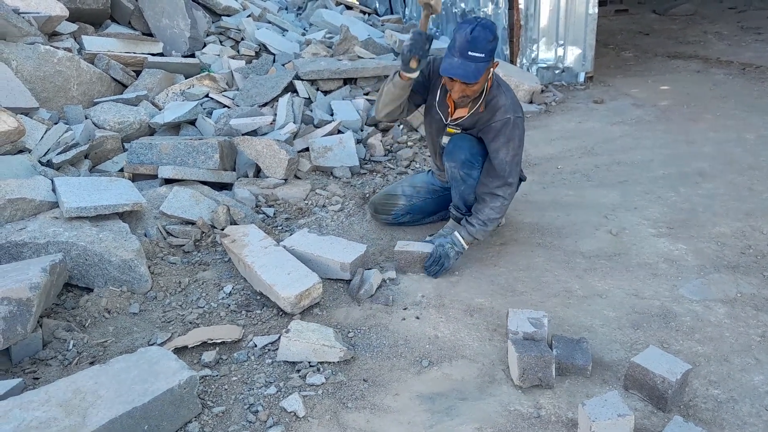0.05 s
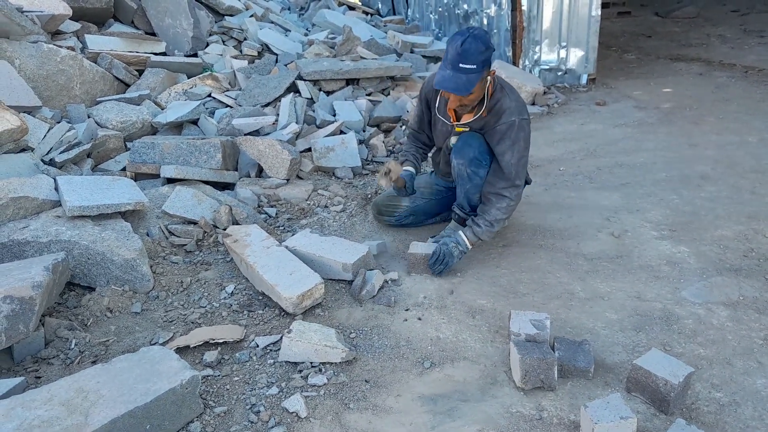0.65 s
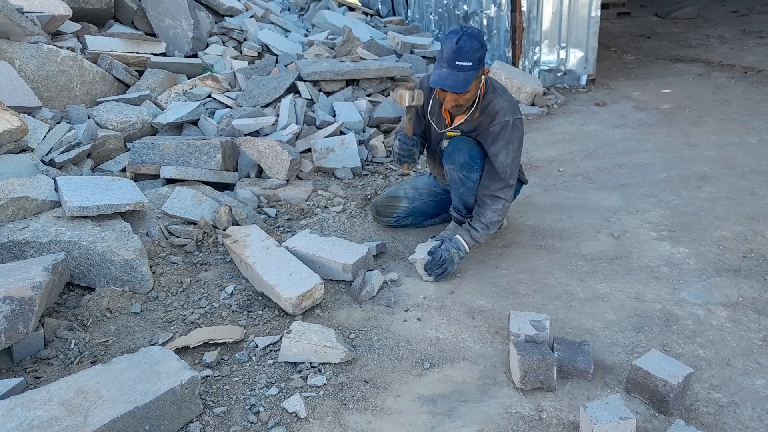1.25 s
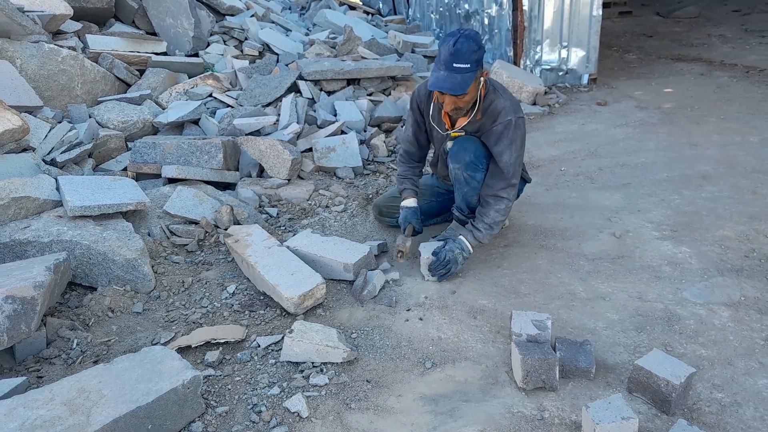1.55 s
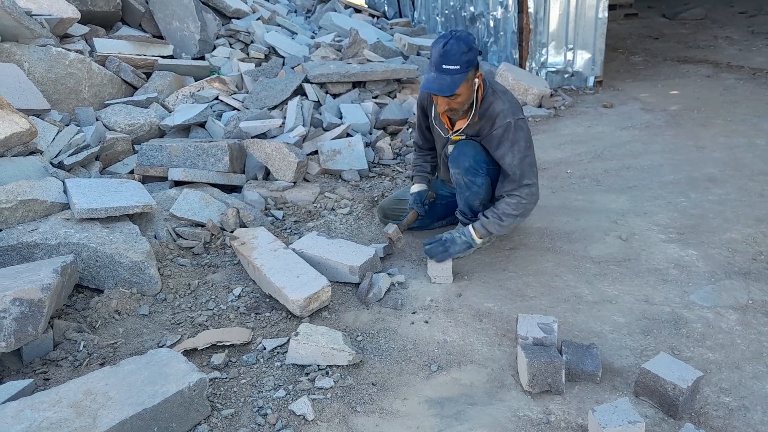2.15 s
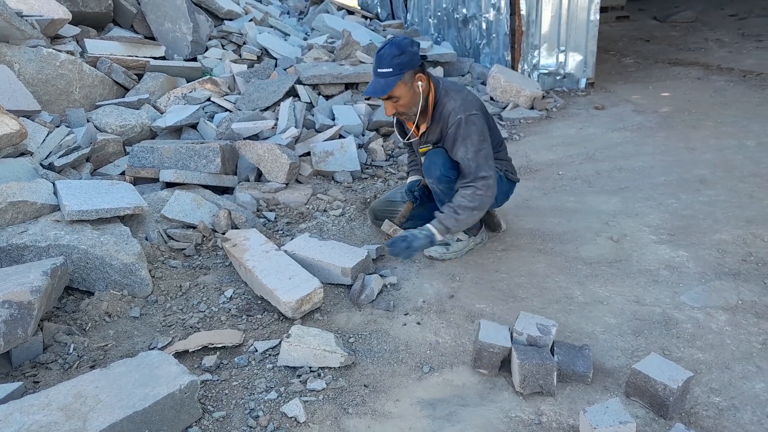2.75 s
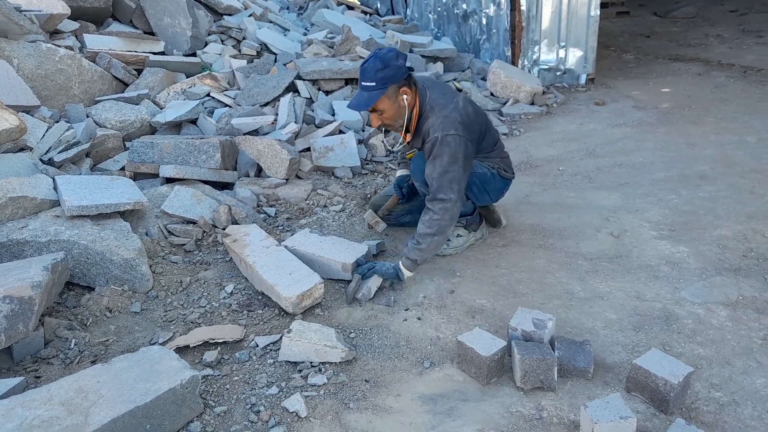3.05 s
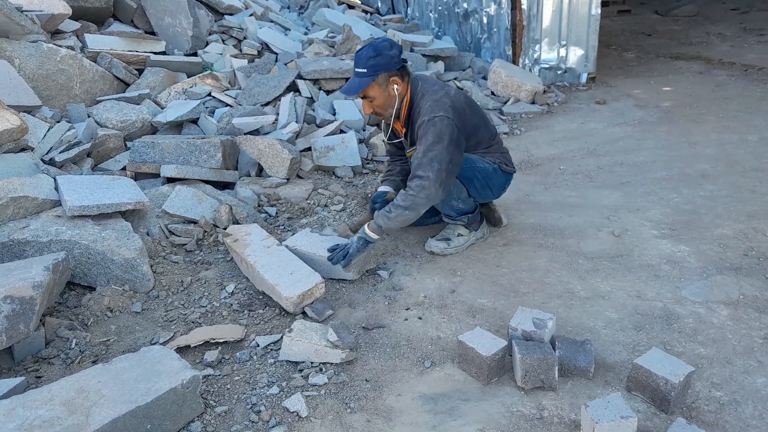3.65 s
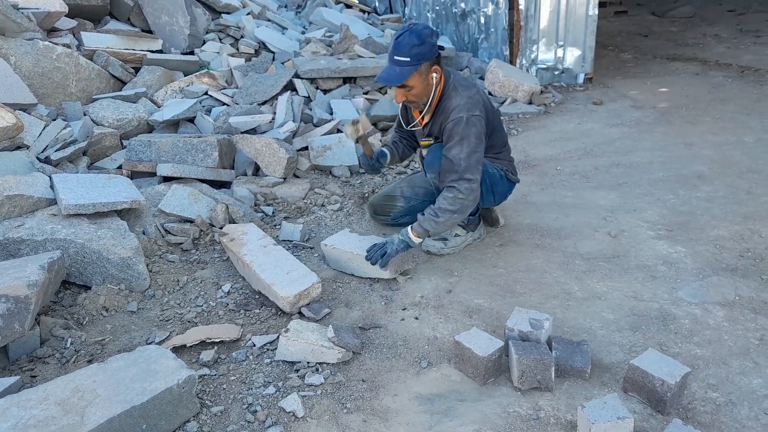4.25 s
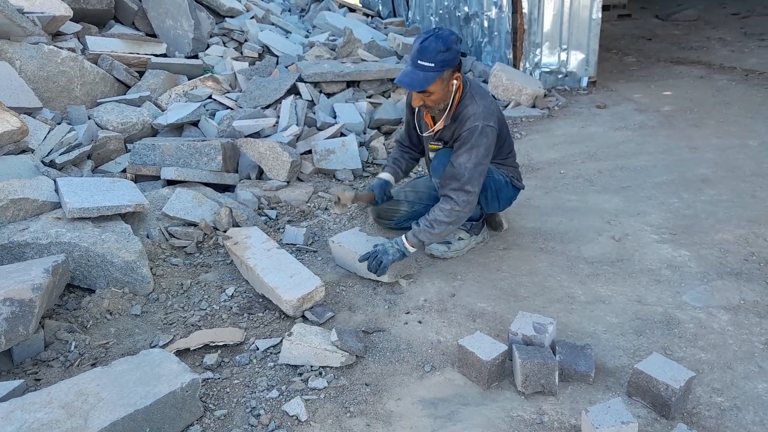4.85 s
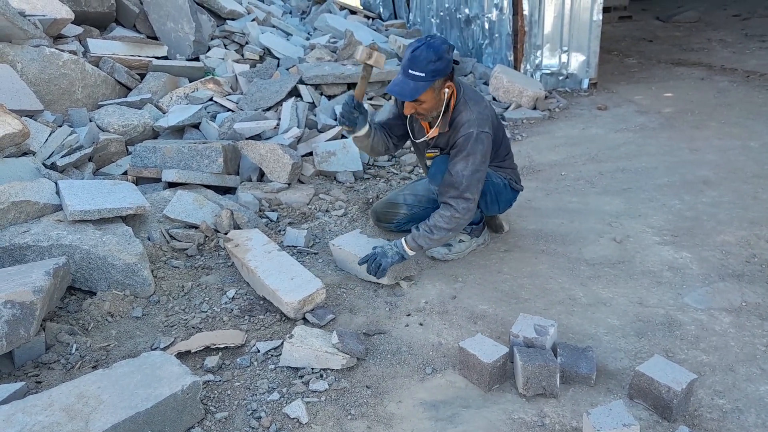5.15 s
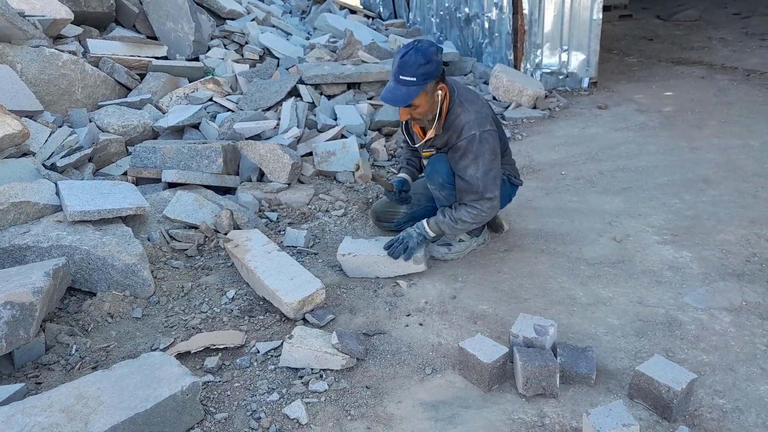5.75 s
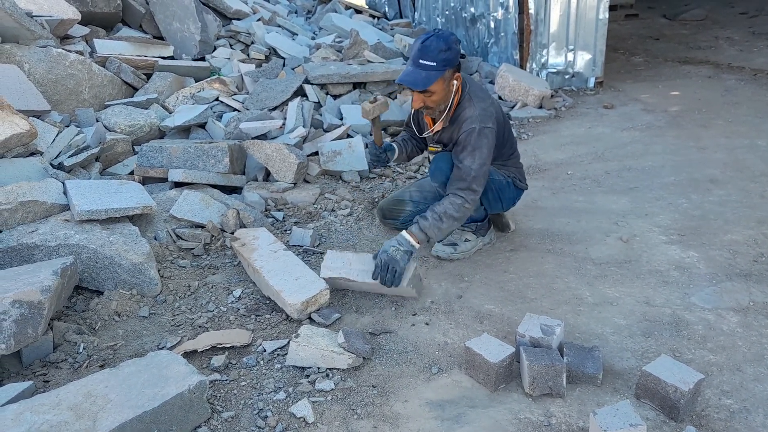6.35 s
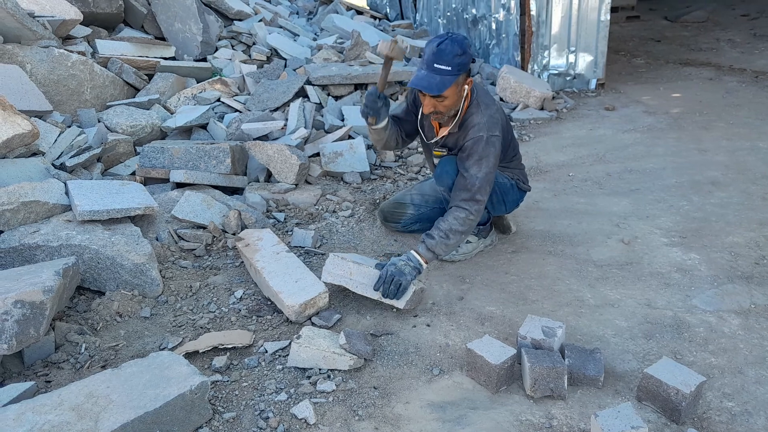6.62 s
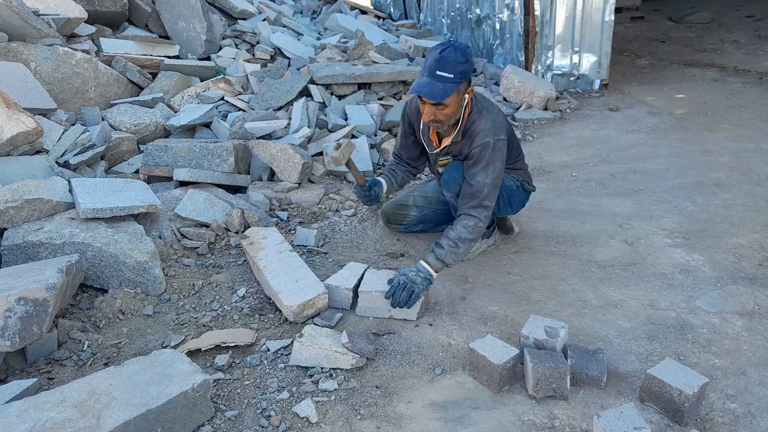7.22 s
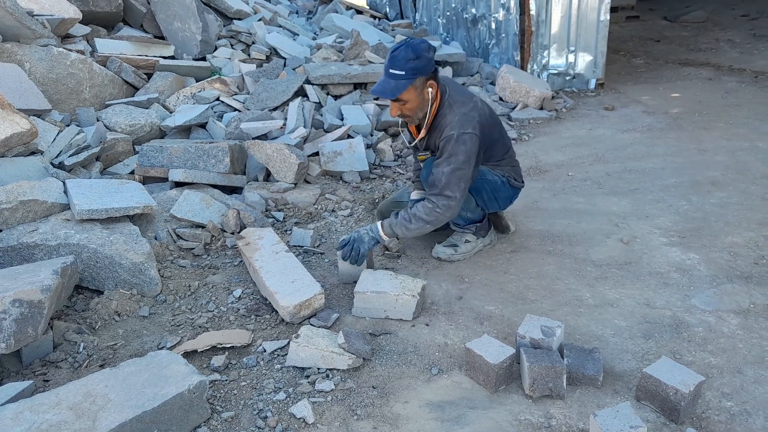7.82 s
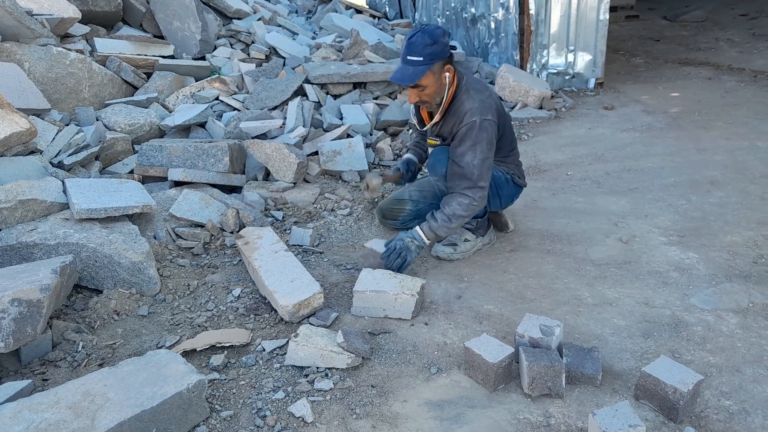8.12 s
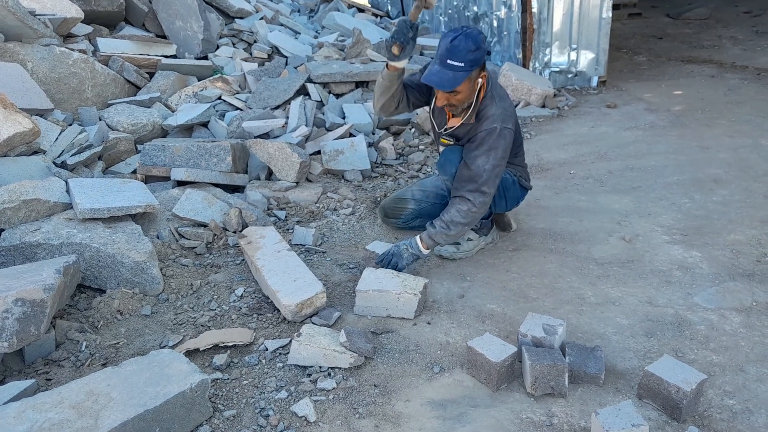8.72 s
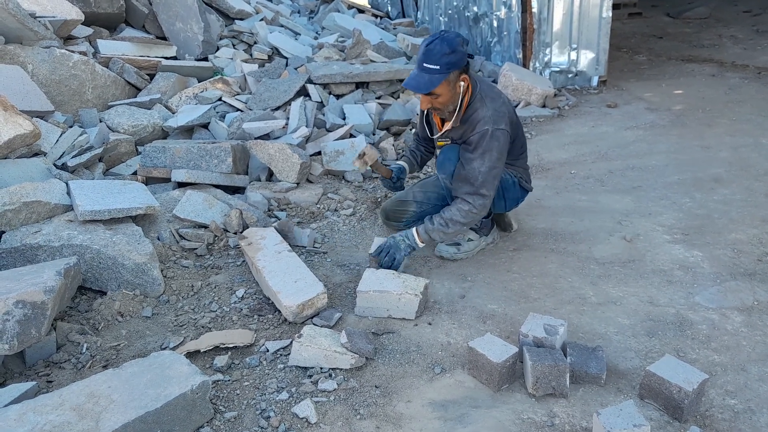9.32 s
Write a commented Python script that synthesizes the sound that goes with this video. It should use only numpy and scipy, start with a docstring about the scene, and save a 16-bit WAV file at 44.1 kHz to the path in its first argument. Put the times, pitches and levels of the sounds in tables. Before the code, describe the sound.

Sharp hammer blows crack stone outdoors, with short echoes, ticking chips and blocks clinking and scraping on concrete.

```python
"""A mason splits stone in an open yard. First his sleeve swishes and wind nudges the microphone.
Three hammer blows crack the slab: stone and steel ring, chips fly, rubble and sheds throw the sound back.
Then blocks thud down, clink together and scrape over gritty concrete. Two blows follow around 5 s,
and two more near 7 s and 9 s, among further scrapes, knocks and gusts.
A last clink ends the scene, over the low rumble that lies under it all."""
import sys
import numpy as np
from scipy import signal
from scipy.fft import rfft, irfft, next_fast_len
from scipy.io import wavfile

SR = 44100
rng = np.random.default_rng(int(sys.argv[2]) if len(sys.argv) > 2 else 0)


def transcribe(signal):
    """Save signal, clipped to [-1, 1], as a 16-bit WAV file at the path in sys.argv[1]."""
    frames = np.atleast_2d(signal).T
    limited = np.clip(frames, -1, 1)
    pcm = np.round(limited * 32767).astype(np.int16)
    wavfile.write(sys.argv[1], SR, pcm)


N = 422478

# Levels are relative. t60 is the time a sound takes to fade by 60 dB.
# hammer blows: t/s, level/dB, treble/dB, fizz/dB, body f/Hz, body level/dB,
# ring f/Hz, ring level/dB, ring damping/factor, steel level/dB, echo level/dB
HAMMER_BLOWS = [(0.3823, -0.5, -1, -6, 800, 2, 2960, -18.5, 3.5, -28.5, 0.5),
                (1.5180, 1, 5.5, -5.5, 1050, 8, 5800, -30, 4, -35, -5),
                (2.0282, -4, -6.5, 16.5, 1090, 5.5, 3740, -26, 3.8, -33.5, -5.5),
                (4.8367, -1, -3, -4.5, 760, 6.5, 3450, -31.5, 0.7, -37.5, 2),
                (5.4048, 0, -7.5, -1, 720, 5.5, 2930, -19.5, 1.86, -39, 2),
                (7.054, -1, 7.5, -12.5, 710, 6, 4290, -33.5, 2.9, -34.5, 3.5),
                (8.9939, 2, 0.5, -9, 1410, -1, 1980, -33, 2.9, -36, -0.5)]
# the tones of a piece of stone: multiple of its ring pitch, level/dB, t60/s
STONE_TONES = [(1, 8, 0.042), (1.035, -11, 0.026), (1.13, -1, 0.043), (1.376, -8.5, 0.081),
               (1.805, -16.5, 0.085), (2.185, -18.5, 0.031)]
# the tones of the steel hammer head: f/Hz, level/dB, t60/s
STEEL_TONES = [(9720, 0, 0.1), (9780, -12.5, 0.11), (12550, -12.5, 0.036), (6470, -16.5, .1)]
# the tones of the ground under the slab: f/Hz, level/dB, t60/s
GROUND_TONES = [(222, -3, 0.061), (410.3, -3, 0.045)]
# the crack of crushed stone: f/Hz, level/dB
CRACK_SPECTRUM = [(30, 1), (90, 5.5), (200, 23.5), (320, 18), (700, 20), (1200, 16.5), (1800, 12.5),
                  (3000, 13), (4800, 7), (7000, 2), (9000, -3.5), (13000, -3), (16000, -9.5)]
# blocks meeting the ground: t/s, level/dB, treble/dB, body f/Hz, body level/dB
BLOCK_DROPS = [(1.028, -22.5, 5, 290, 8.5), (2.0442, -16, 14.5, 705, 2.5), (2.7552, -37.5, 28, 900, 12),
               (2.7766, -26.5, -25, 770, 10.5), (2.8109, -15.5, -3, 1010, 12.5), (3.955, -37, -8, 1210, 9),
               (4.3065, -31.5, 16, 950, 1.5), (6.411, -25, 6, 960, 3), (6.461, -32.5, 0, 140, 5.5),
               (7.651, -40, 5, 892, 5), (8.2232, -25, 11, 371, 6), (8.595, -41.5, 5.5, 508, 5)]
# stone knocking on stone: t/s, level/dB, treble/dB, ring f/Hz, ring level/dB, ring damping/factor
STONE_KNOCKS = [(3.103, -19.5, -7, 2740, -42, 1.7), (3.193, -16.5, 2, 3300, -27.5, 3.2),
                (3.204, -19.5, -2, 1900, -35.5, 0.8), (3.282, -7, -30, 3570, -27.5, 1),
                (3.337, -27.5, 9, 4600, -49.5, 0.7), (3.422, -44, 30, 3610, -44, 1),
                (3.5849, -9, -40, 2000, -41, 2), (3.683, -27, -12, 3130, -40, 1.2),
                (4.215, -26.5, 15, 2990, -41, 1.35), (6.409, -40, 21.5, 3100, -40, 0.94),
                (7.7463, -19.5, 5.5, 3340, -42.5, 1.3), (9.364, -33, 1, 1134, -44, .6),
                (9.478, -22.5, -21, 1174, -42.5, 0.69)]
# the loudest chips snapping or landing: t/s, level/dB, body f/Hz
LOUD_CHIPS = [(0.77, -31.5, 6780), (2.058, -20, 11000), (2.118, -24.5, 7500), (3.186, -18.5, 2940),
              (3.257, -26, 8050), (4.227, -24.5, 3840), (6.265, -35, 4000), (6.304, -33.5, 3200),
              (6.443, -32, 4800), (6.558, -37.5, 3140)]
# a block or boot dragged over grit: t/s, length/s, level/dB
DRAGS = [(0.65, 0.19, -66), (1.15, .25, -72.5), (2.24, 0.15, -69), (2.5, 0.016, -57.5), (2.63, .04, -63),
         (2.78, 0.54, -60.5), (3.02, 0.23, -47), (3.35, 1, -56), (3.6, 0.18, -51), (4.12, .18, -58.5),
         (5.6, .28, -63.5), (5.92, 0.049, -59.5), (6.22, 0.34, -61.5), (6.4, 0.054, -55),
         (7.55, 0.33, -67.5), (8.13, 0.21, -63), (8.52, 0.11, -67), (9.25, 0.3, -65)]
# the hiss of grit: f/Hz, level/dB
GRIT_SPECTRUM = [(710, -20), (1200, -63), (1370, -65), (1490, -21.5), (2380, -3.5), (2890, -1.5),
                 (7740, -6.5), (9310, -13), (14800, -9.5), (16000, -33)]
# the sleeve brushing the jacket on the first swing: t/s, length/s, level/dB
SLEEVE_BRUSH = [(0.0, .17, -60)]
# the swish of cloth: f/Hz, level/dB
CLOTH_SPECTRUM = [(880, -29), (1500, -4), (2490, -9), (3550, -5), (7320, -10.5), (9280, -22.5),
                  (16000, -26)]
# the yard's echo: f/Hz, level/dB, time before it fades/s, t60/s
YARD_ECHO = [(80, 9, 0.041, 0.89), (221, -0.5, 0.028, 0.54), (355, 1.5, 0.063, 0.59),
             (800, -0.5, 0.082, 0.64), (1570, 3, 0.038, 0.61), (2830, -2, 0.044, 0.53),
             (6000, -4, 0.041, 0.43), (11990, -5, 0.047, 0.33)]
# single echoes from walls: delay/s, level/dB
WALL_ECHOES = [(.0215, -13), (.057, -13), (.085, -13), (.111, -16)]
# how alike the echo is on the left and right: f/Hz, likeness/0-1
ECHO_LIKENESS = [(50, .7), (250, 0.95), (600, .65), (1200, 0), (3000, 0)]
# gusts on the microphone: t/s, length/s, level/dB
WIND_GUSTS = [(0.03, 0.11, -25), (0.22, .07, -32), (0.58, 0.31, -45), (7.22, 0.367, -36),
              (7.84, 0.536, -30.5), (9.36, 0.068, -39)]
# the rumble of wind: f/Hz, level/dB
WIND_SPECTRUM = [(15, -65.5), (25, -12.5), (86, 6), (141, 0), (316, -12), (545, -25), (600, -28.5),
                 (662, -35.5), (700, -32), (910, -67.5), (1540, -120)]
# the distant background: f/Hz, level/dB
BACKGROUND_SPECTRUM = [(12, -36.5), (20, -29), (33, -7), (60, 2), (154, -12), (270, -14), (347, -16),
                       (410, -20), (698, -17), (1330, -28), (2080, -32.5), (3070, -40.5), (5230, -45.5),
                       (9400, -55.5), (16000, -56.5)]
# its slow swell, used only as a rise and fall around the average: t/s, level/dB
BACKGROUND_SWELL = [(0, -52), (1.3, -56.5), (3.6, -51), (4.5, -52.5), (5.999, -57.5), (7, -56), (9.6, -56)]
# how the two microphones differ: f/Hz, left minus right level/dB
MIC_BALANCE = [(60, 1.5), (110, -4.5), (200, 1), (380, 1.5), (700, 1), (1290, 1.0), (2380, 0.5),
               (4400, -2.5), (8120, 2), (15000, 1)]


def hammer(steel_echo_db=-13, ring_echo_db=-11, thud_echo_db=-3, bite_db=4, thud_db=-21, absorbed=0.9):
    """Each blow cracks the stone, rings stone and steel, thuds into the ground and echoes round the yard."""
    out = np.zeros((2, N))
    for (s, db, treble_db, fizz_db, body_hz, body_db,
         ring_hz, ring_db, damping, steel_db, echo_db) in HAMMER_BLOWS:
        tone = 0, treble_db, fizz_db, [(body_hz, body_db), (ring_hz, bite_db)]
        detune = rng.uniform(0.9975, 1.0025)
        stone = amp(ring_db) * ring(STONE_TONES, ring_hz, damping)
        steel = amp(steel_db) * ring(STEEL_TONES, detune)
        # a bright blow spends its force on breaking the stone, so less reaches the ground
        thud = amp(db + thud_db - absorbed * max(treble_db, 0)) * ring(GROUND_TONES)
        direct = stone + steel + thud
        add(direct, 0, amp(db) * crack(*tone, crush_s=0.003, crumble=2.1))
        # sound leaves in all directions, so the echo carries a smooth, averaged crack
        spread = amp(ring_echo_db) * stone + amp(steel_echo_db) * steel + amp(thud_echo_db) * thud
        add(spread, 0, amp(db) * crack(*tone))
        add(out, s, direct)
        add(out, s, amp(echo_db) * yard(spread))
    return out


def crack(bass_db, treble_db, fizz_db, bodies, crush_s=0, crumble=0, size=2048):
    """A sharp push and crumbling grains, coloured by the stone's broad peaks (bodies: f/Hz, level/dB)."""
    t = np.arange(size) / SR
    hz = abs(np.fft.fftfreq(size, 1 / SR)) + 1
    grains = colour(rng.standard_normal((2, size)), [(300, -2.5), (1200, -5), (3000, -5.5)],
                    [(900, 0.93), (3000, 0.21), (7000, -0.48), (13000, 0.26)])
    grains *= np.exp(-t / (crush_s + 1 / SR))
    push = t == 0
    force = push + crumble * grains / np.linalg.norm(grains, axis=1, keepdims=True)
    shape_db = read(CRACK_SPECTRUM, hz) + bass_db / (1 + (hz / 1300) ** 3)
    shape_db += treble_db / (1 + (4500 / hz) ** 3)
    shape_db += fizz_db / (1 + (9000 / hz) ** 6)
    shape_db += sum(db / (1 + (np.log(hz / f) / 0.36) ** 2) for f, db in bodies)
    # a filter of that shape which makes no sound before the push
    response = np.exp(np.conj(signal.hilbert(np.log(amp(shape_db)))))[:size // 2 + 1]
    return irfft(rfft(force) * response) / np.hypot(1, crumble)


def ring(tones, pitch=1, damping=1):
    """A struck thing rings with a few fading tones; damping, as from a pressing hand, shortens them."""
    t = np.arange(SR // 6) / SR
    phases = rng.uniform(-0.7, 0.7, (len(tones), 2, 1))
    return sum(amp(db - 60 * damping * t / t60) * np.sin(2 * np.pi * f * pitch * t + phase)
               for (f, db, t60), phase in zip(tones, phases))


def thuds(bass_db=14, weight_hz=135, weight_db=5, ring_hz=1130, ring_db=-21, echo_db=-9):
    """A block meets the ground: a heavy, dull knock that crushes grit and barely rings."""
    out, spread = np.zeros((2, 2, N))
    for s, db, treble_db, body_hz, body_db in BLOCK_DROPS:
        tone = bass_db, treble_db, 0, [(body_hz, body_db), (weight_hz, weight_db)]
        add(out, s, amp(db + ring_db) * ring(STONE_TONES, ring_hz))
        add(out, s, amp(db) * crack(*tone, crush_s=0.0042, crumble=4.7))
        add(spread, s, amp(db) * crack(*tone))
    return out + amp(echo_db) * yard(spread, wall_db=4.5)[:, :N]


def clinks(bass_db=-8, body_hz=1300, body_db=6, bite_db=3, echo_db=-6, ring_echo_db=-5):
    """Stone meets stone: a light click, and the piece rings at its own pitch."""
    out, spread = np.zeros((2, 2, N))
    for s, db, treble_db, ring_hz, ring_db, damping in STONE_KNOCKS:
        tone = bass_db, treble_db, 0, [(body_hz, body_db), (ring_hz, bite_db)]
        clink = amp(ring_db) * ring(STONE_TONES, ring_hz, damping)
        add(out, s, clink)
        add(out, s, amp(db) * crack(*tone, crush_s=0.0039, crumble=2.7))
        add(spread, s, amp(ring_echo_db) * clink)
        add(spread, s, amp(db) * crack(*tone))
    return out + amp(echo_db) * yard(spread)[:, :N]


def chips(echo_db=-10, body_db=10, per_blow=3, flight_s=(0.15, 0.37), splinter_db=-35.5, fade_db_per_s=44):
    """Chips tick on the concrete. Every blow throws splinters: the longer they fly, the softer they land."""
    out = np.zeros((2, N))
    splinters = [(s + flight, splinter_db - fade_db_per_s * flight, rng.uniform(2500, 8400))
                 for s, *_ in HAMMER_BLOWS for flight in rng.uniform(*flight_s, per_blow)]
    for s, db, body_hz in LOUD_CHIPS + splinters:
        tick = crack(bass_db=-17.5, treble_db=8.5, fizz_db=1.5, bodies=[(body_hz, body_db)],
                     crush_s=0.0029, crumble=5.4)
        add(out, s, amp(db) * tick)
    return out + amp(echo_db) * yard(out)[:, :N]


def dragging(grains_db=5, grains_per_s=220, spread_db=4.5, snap_s=0.0039):
    """Sand hisses under a sliding block or boot while larger grains snap one by one."""
    strengths = amp(spread_db * np.minimum(rng.exponential(1, N), 4.5))
    snaps = strengths * (rng.random(N) < grains_per_s / SR)
    fading_snaps = signal.lfilter([1], [1, -np.exp(-1 / (snap_s * SR))], snaps)
    bursts = np.pad(fading_snaps * rng.standard_normal((2, N)), ((0, 0), (0, next_fast_len(N) - N)))
    grains = unit(colour(bursts, GRIT_SPECTRUM, [(1000, 0.66), (12000, 0.19)])[:, :N])
    sand = noise(GRIT_SPECTRUM, [(1000, 0.57), (12000, 0.15)])
    return strokes(DRAGS, rise_s=0.011, fall_db_per_s=110) * rasp(sand + amp(grains_db) * grains)


def rasp(x, patch_db=3.2, slip_db=2):
    """Grit catches and slips: each contact briefly favours its own patch of pitch."""
    bands = signal.stft(x, SR, nperseg=256)[2]
    blur = np.outer(np.hanning(8), np.hanning(14))
    patches = unit(signal.fftconvolve(rng.standard_normal(bands.shape[1:]), blur, "same"))
    slips = unit(np.convolve(rng.standard_normal(bands.shape[2]), np.hanning(14), "same"))
    bands *= amp(patch_db * patches + slip_db * slips)
    return unit(signal.istft(bands, SR, nperseg=256)[1][:, :N])


def sleeve():
    """Cloth swishes softly as the arm comes down."""
    swish = noise(CLOTH_SPECTRUM, [(1000, 0.35), (12000, 0.3)])
    return strokes(SLEEVE_BRUSH, rise_s=0.028, fall_db_per_s=76) * swish


def yard(x, late_db=-21, late_t60=1.0, rise_s=0.017, lumpy_db=3, wall_band_hz=(350, 1600), wall_db=0):
    """Rubble scatters the sound, walls add single echoes and far sheds leave a faint tail."""
    size = 45056
    scatter = rng.standard_normal((2, size))
    scatter *= amp(lumpy_db * rng.standard_normal(size // 32).repeat(32))
    hz, t, bands = signal.stft(colour(unit(scatter), YARD_ECHO, ECHO_LIKENESS), SR, nperseg=256)
    hold_s = read(YARD_ECHO, hz, column=2)[:, None]
    t60 = read(YARD_ECHO, hz, column=3)[:, None]
    rubble = amp(-60 * np.maximum(t - hold_s, 0) / t60)
    sheds = amp(late_db - 60 * t / late_t60)
    fade = np.hypot(rubble, sheds) * np.minimum(t / rise_s, 1)
    fade /= np.sqrt(np.mean(fade ** 2, axis=1, keepdims=True) * size)
    echo = signal.istft(bands * fade, SR, nperseg=256)[1]
    # rough walls return little treble
    slap = signal.lfilter(*signal.butter(2, wall_band_hz, "band", fs=SR), np.arange(400) == 0)
    for s, db in WALL_ECHOES:
        lags = rng.integers(0, 16, 2)  # each echo comes from its own side
        add(echo, s, amp(db + wall_db) * np.array([np.roll(slap, lag) for lag in lags]))
    return signal.fftconvolve(x, echo, axes=1)


def wind(gust_db=-1, lumpy_db=3):
    """Swirls of air buffet the microphone in low, uneven lumps."""
    swirls = noise([(1, -27.0), (18, 16), (40, -64.5), (200, -120)], [(1, 0.93), (40, 0.46)])
    rumble = noise(WIND_SPECTRUM, [(50, 0.091), (400, 0.25)])
    gusts = strokes(WIND_GUSTS, rise_s=0.0093, fall_db_per_s=251)
    return amp(gust_db) * gusts * unit(rumble * amp(lumpy_db * swirls))


def background(level_db=-44.5):
    """The distant rumble and hush of the surroundings, slowly rising and falling."""
    swell_db = np.interp(np.arange(N) / SR, *np.transpose(BACKGROUND_SWELL))
    hush = noise(BACKGROUND_SPECTRUM, [(40, 0.83), (250, 0.99), (600, 0.46), (1500, 0.033), (8000, 0.13)])
    return amp(level_db + swell_db - swell_db.mean()) * hush


def strokes(rows, rise_s, fall_db_per_s):
    """A loudness curve: each row (t/s, length/s, level/dB) rises, holds and dies away."""
    t = np.arange(N) / SR
    power = np.zeros(N)
    for s, length, db in rows:
        rise = np.clip((t - s) / rise_s, 0, 1)
        fall_db = fall_db_per_s * np.maximum(t - s - length, 0)
        power += (rise * amp(db - fall_db)) ** 2
    return np.sqrt(power)


def noise(spectrum, likeness):
    """Steady stereo noise of average strength 1."""
    white = rng.standard_normal((2, next_fast_len(N)))
    return unit(colour(white, spectrum, likeness)[:, :N])


def colour(x, spectrum, likeness):
    """Shapes two noises (f/Hz, level/dB) and sets how alike left and right are (f/Hz, likeness)."""
    hz = np.fft.rfftfreq(x.shape[1], 1 / SR)
    left, other = rfft(x)
    same = np.clip(read(likeness, hz), -1, 1)
    right = same * left + np.sqrt(1 - same ** 2) * other
    return irfft(np.array([left, right]) * amp(read(spectrum, hz)), x.shape[1])


def read(points, hz, column=1):
    """Looks up a table at any frequency, gliding between rows on a log scale."""
    table = np.transpose(points)
    return np.interp(np.log(hz + 1), np.log(table[0] + 1), table[column])


def add(mix, s, sound):
    """Mixes a stereo sound in at s seconds."""
    part = mix[:, round(s * SR):][:, :sound.shape[1]]
    part += sound[:, :part.shape[1]]


def amp(db):
    """Turns decibels into a gain."""
    return 10 ** (np.asarray(db) / 20)


def unit(x):
    """Scales a signal to an average strength (rms) of 1."""
    return x / np.sqrt(np.mean(x ** 2) + 1e-20)


def scene():
    """All that sounds in the yard."""
    return hammer() + thuds() + clinks() + chips() + dragging() + sleeve() + wind() + background()


def record(dry, low_cut_hz=36, high_cut_hz=16500):
    """Two slightly unlike microphones lose deep rumble, flatten loud cracks and cut the top treble."""
    size = next_fast_len(N + 4096)
    hz = np.fft.rfftfreq(size, 1 / SR)
    balance = amp(read(MIC_BALANCE, hz) * np.array([[0.5], [-0.5]]))
    response = balance / np.hypot(1, (low_cut_hz / (hz + 1)) ** 3)
    heard = irfft(rfft(dry, size) * response, size)[:, :N]
    limited = heard / (1 + heard ** 6) ** (1 / 6)
    high_cut = signal.firwin(401, high_cut_hz, window=("kaiser", 9), fs=SR)
    return signal.oaconvolve(limited, high_cut[None], "same")


dry = scene()
out = record(dry)
transcribe(out)
```